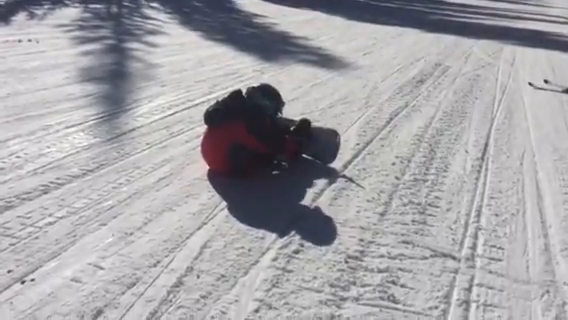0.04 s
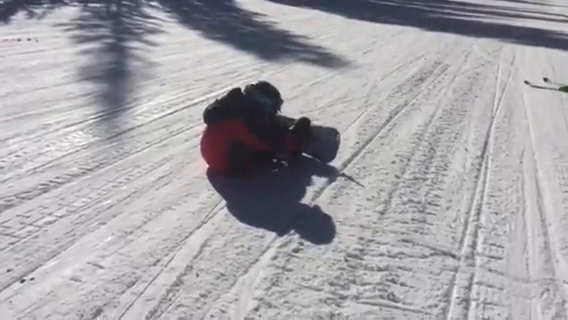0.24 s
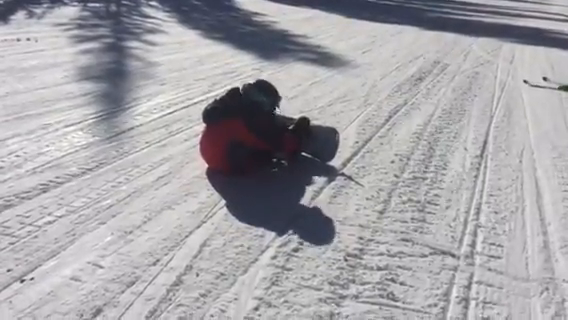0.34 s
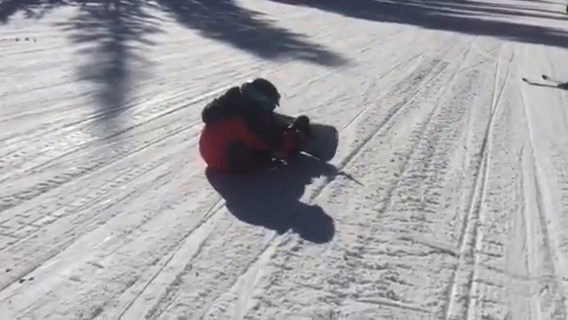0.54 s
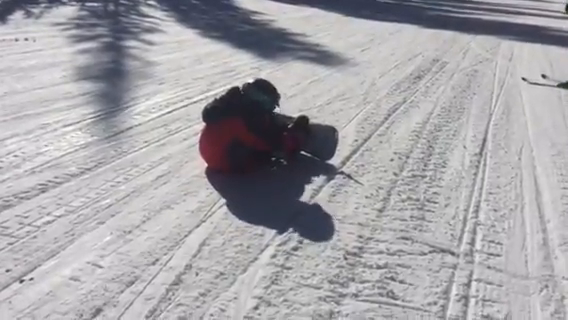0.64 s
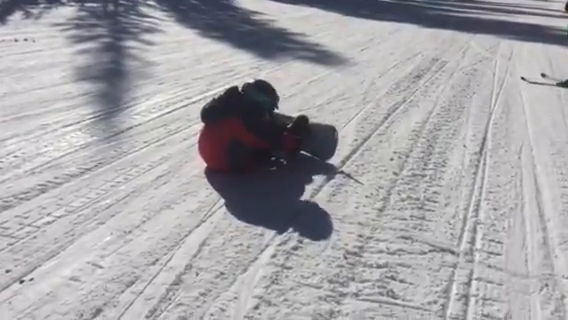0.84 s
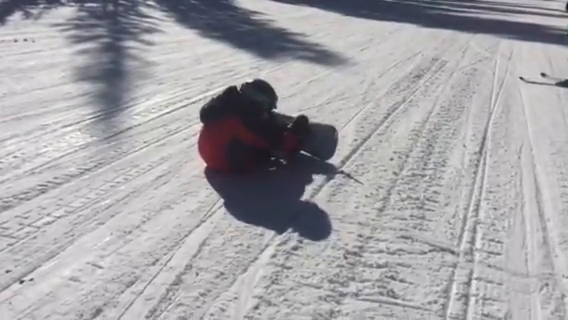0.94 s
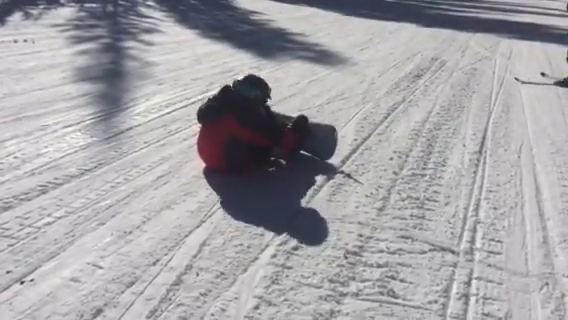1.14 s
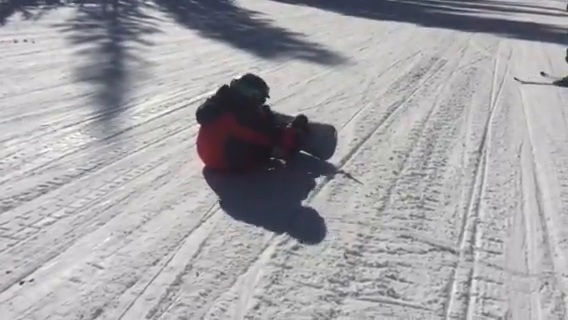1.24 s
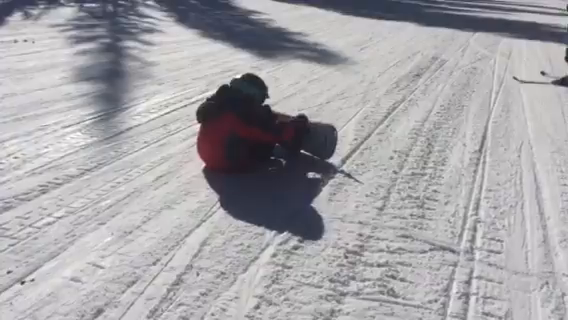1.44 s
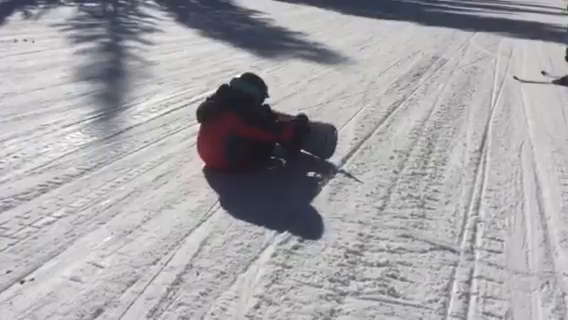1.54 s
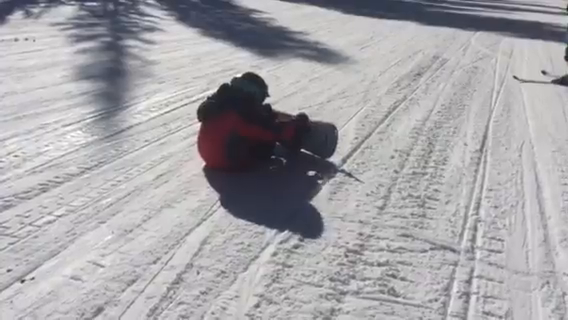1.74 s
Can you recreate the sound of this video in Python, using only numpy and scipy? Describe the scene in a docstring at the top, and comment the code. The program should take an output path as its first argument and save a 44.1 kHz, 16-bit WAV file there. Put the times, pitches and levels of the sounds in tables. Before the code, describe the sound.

Sharp, dry clicks of a snowboard binding sound close by on an open slope. The ratchet snaps twice, a boot knocks softly, a catch clicks and the buckle clacks shut, over faint clothing rustle and low wind.

```python
"""On a groomed slope, over low wind and a far rumble, a snowboarder tightens a binding. Clothes rustle,
then the ratchet snaps twice as its pawl drops over the teeth. The board bumps softly on the snow and the
strap slips in tiny ticks. The boot knocks in its shell, a catch clicks, glove and boot scuff, and last
the buckle clacks down and shakes the board. Each impact rings as a set of heavily damped modes.
Throughout, the snow absorbs nearly all echo, and only a faint scatter returns from the trees."""
import sys
import numpy as np
from scipy import signal
from scipy.fft import rfft, irfft
from scipy.io import wavfile

SR = 44100
rng = np.random.default_rng(int(sys.argv[2]) if len(sys.argv) > 2 else 0)


def wav_record(signal):
    """Record a signal, one row per channel, as 16-bit PCM in the file named by sys.argv[1]."""
    frames = np.transpose(np.atleast_2d(signal))
    bounded = np.clip(frames, -1, 1)
    # unit amplitude maps onto the largest positive 16-bit level
    quanta = np.round(bounded * 32767).astype(np.int16)
    wavfile.write(sys.argv[1], SR, quanta)


N = 79380
TIME = np.arange(N) / SR


def from_db(db):
    """Amplitude ratio of a level in decibels."""
    return 10 ** (np.asarray(db) / 20)


def rms_one(x):
    """Normalisation to unit rms."""
    return x / np.sqrt(np.mean(x ** 2) + 1e-20)


def high_pass(x, hz, order):
    """Butterworth attenuation below a cutoff."""
    return signal.sosfilt(signal.butter(order, hz, "high", fs=SR, output="sos"), x)


def noise(spectrum):
    """Spectral shaping: unit-rms noise with the given relative density, rolled off below its first row."""
    hz, db = np.transpose(spectrum)
    bins_hz = np.maximum(np.fft.rfftfreq(N, 1 / SR), 1)
    roll_off = np.minimum(bins_hz / hz[0], 1) ** 2
    gain = from_db(np.interp(np.log(bins_hz), np.log(hz), db))
    return rms_one(irfft(rfft(rng.standard_normal(N)) * roll_off * gain, N))


def band_noise(hz, edge_ratio, order=1):
    """Band-limited noise of unit rms, its edges a ratio (at least 1.05) below and above the centre."""
    edge_ratio = max(edge_ratio, 1.05)
    edges_hz = [hz / edge_ratio, min(hz * edge_ratio, .45 * SR)]
    band = signal.butter(order, edges_hz, "band", fs=SR, output="sos")
    return rms_one(signal.sosfilt(band, rng.standard_normal(N)))


def drift(rate_hz):
    """Random modulation of unit rms, interpolated between values drawn at the given rate."""
    return rms_one(np.interp(TIME * rate_hz, np.arange(N), rng.standard_normal(N)))


def swell(start_s, rise_s):
    """Critically damped envelope: it reaches 1 after the rise time, then decays."""
    age = np.maximum(TIME - start_s, 0) / rise_s
    return age * np.exp(1 - np.minimum(age, 100))


def strike(start_s, modes, pitch_ratio=1):
    """Modal superposition: an impact excites damped sinusoids that ring for milliseconds."""
    return sum(from_db(db) * swell(start_s, rise_s)
               * np.sin(2 * np.pi * hz * pitch_ratio * (TIME - start_s)) for hz, db, rise_s in modes)


def friction_grain():
    """Amplitude modulation: the rapid random flutter that makes rubbing sound grainy."""
    return from_db(4.5 * drift(rate_hz=1500))


# Spectrum of the far rumble and air: frequency_hz, relative_density_db
AIR_SPECTRUM = [(25, -25.5), (45, -16.5), (80, -1.5), (160, 0), (280, -5.5), (450, -7.5), (650, -8),
                (1000, -16.5), (1700, -20.5), (3200, -23.5), (6000, -27.5), (9300, -29.5), (10500, -33),
                (15600, -33.5), (16200, -55)]
# Spectrum of the distant wash: frequency_hz, relative_density_db
WASH_SPECTRUM = [(120, -22), (250, -1), (450, 2.5), (650, -8), (1000, -13), (2500, -26.5), (16000, -60)]
# Envelope of the wash: time_s, relative_level_db
WASH_ENVELOPE = [(0.0, -74.5), (0.646, -64), (0.952, -72), (1.108, -74.5), (1.8, -79.5)]
def distant_rumble():
    """Ambient noise: a stationary floor, and a low-mid wash that slowly swells and fades."""
    air_db, wash_gain_db = -67, -3.5
    wash_db = wash_gain_db + np.interp(TIME, *np.transpose(WASH_ENVELOPE))
    return from_db(air_db) * noise(AIR_SPECTRUM) + from_db(wash_db) * noise(WASH_SPECTRUM)


# Far-off tones: pitch_hz, level_db
DRONE_TONES = [(88, -69.5), (372, -78.5), (445, -77), (607, -80)]
def drones():
    """Random frequency and amplitude modulation makes each faint tone waver."""
    wander_fraction, waver_db = .025, 3.5
    out = 0
    for hz, db in DRONE_TONES:
        pitch_hz = hz * (1 + wander_fraction * drift(rate_hz=14))
        phase = 2 * np.pi * np.cumsum(pitch_hz) / SR
        waver = from_db(waver_db * drift(rate_hz=9))
        out += from_db(db) * rms_one(waver * np.sin(phase))
    return out


# Spectrum of the wind: frequency_hz, relative_density_db
WIND_SPECTRUM = [(25, -32), (55, -14), (90, -2), (170, -0.5), (260, -14.5), (600, -40), (16000, -80.5)]
# Envelope of the wind: time_s, level_db
WIND_ENVELOPE = [(0.0, -69), (0.42, -63), (0.796, -68), (1.202, -63.5), (1.534, -80), (1.8, -70.5)]
# Buffets of wind at the microphone: start_s, level_db, centre_hz
WIND_BUFFETS = [(.04, -54, 102), (.262, -56.5, 75), (.378, -61, 165), (0.501, -60.5, 114),
                (.598, -58.5, 172.3), (.79, -58.5, 100.5), (1.02, -57, 145), (1.168, -57, 130),
                (1.235, -57.5, 167), (1.71, -56.5, 105.4)]
def wind():
    """Turbulent pressure fluctuations at the microphone give a low rumble with brief buffets."""
    rumble = from_db(np.interp(TIME, *np.transpose(WIND_ENVELOPE))) * noise(WIND_SPECTRUM)
    buffets = sum(from_db(db) * swell(start_s, rise_s=.013) * band_noise(hz, edge_ratio=1.35, order=2)
                  for start_s, db, hz in WIND_BUFFETS)
    return rumble + buffets


# Movements of the clothes: start_s, level_db, rise_s
CLOTH_MOVES = [(.125, -76.5, 0.024), (.2, -76.5, 0.022), (.36, -68, 0.018), (1.044, -69.5, 0.027),
               (1.375, -70.5, 0.018)]
# Spectrum of rubbing cloth: frequency_hz, relative_density_db
CLOTH_SPECTRUM = [(600, -10), (1500, 3.5), (4200, -2), (7000, -5), (16000, -10)]
def clothes():
    """Sliding friction of cloth radiates grainy broadband noise with each movement."""
    envelope = sum(from_db(db) * swell(start_s, rise_s) for start_s, db, rise_s in CLOTH_MOVES)
    return envelope * rms_one(friction_grain() * noise(CLOTH_SPECTRUM))


# Snaps of the pawl: start_s, gain_db, pitch_ratio, landing_delay_s, landing_db, treble_gain_db
PAWL_SNAPS = [(0.2413, -2.5, 1.018, .000725, -8, -4), (0.3894, -0.77, 1.005, 0.0005345, -10, 2)]
# Modes of the ratchet: base_pitch_hz, relative_level_db, rise_s
RATCHET_MODES = [(1272, -33.5, 0.00041), (1917, -49, 0.00025), (2952, -32, 0.00085), (3580, -35, 0.00063),
                 (4116, -22.5, 0.00038), (5195, -14.5, 0.00051), (6104, -12.5, 0.00059),
                 (7850, -12.5, 0.0003), (8460, -21.5, 0.00049), (10900, -29, 0.00029),
                 (12800, -24.5, 0.0004), (13554, -32, 0.00035), (15026, -36.5, 0.0003)]
def ratchet():
    """Two contacts: the pawl slides over a tooth, then lands on it a fraction of a millisecond later; so small
    a radiator gives off no bass."""
    treble_above_hz = 11000
    out = 0
    for start_s, gain_db, pitch_ratio, delay_s, landing_db, treble_db in PAWL_SNAPS:
        modes = [(hz, db + treble_db * (hz > treble_above_hz), rise_s)
                 for hz, db, rise_s in RATCHET_MODES]
        first_contact = strike(start_s, modes, pitch_ratio)
        landing = from_db(landing_db) * strike(start_s + delay_s, modes, pitch_ratio)
        out += from_db(gain_db) * (first_contact + landing)
    return high_pass(out, hz=955, order=6)


# Bumps of the board on the snow: start_s, level_db, pitch_hz, rise_s
BOARD_BUMPS = [(.519, -57, 590, .005), (.6005, -57, 330, .004), (.6015, -60, 1050, .001),
               (.7352, -56, 1050, .0016), (1.243, -54, 175, .005), (1.3065, -59, 1050, .002)]
def board():
    """Damped free vibration: each soft contact with the snow excites a single mode."""
    return sum(strike(start_s, [(hz, db, rise_s)]) for start_s, db, hz, rise_s in BOARD_BUMPS)


# Slips of the strap: start_s, level_db, centre_hz, decay_s, edge_ratio
STRAP_SLIPS = [(0.6023, -49.5, 5140, 0.0015, 1.07), (0.6096, -63, 4000, .001, 1.5),
               (0.72, -57, 2100, .0013, 1.34), (.7357, -57, 2400, .002, 1.35),
               (.751, -58, 2090, 0.0011, 1.3), (.9855, -60.5, 3200, .0012, 1.9),
               (1.0567, -55, 3300, 0.0019, 1.8), (1.1317, -59.5, 2600, 0.0015, 1.7),
               (1.1518, -58, 4000, 0.0011, 1.35), (1.156, -59.5, 6950, .0012, 1.8),
               (1.25, -65, 2100, .0014, 1.4), (1.2869, -61, 4230, .0014, 1.4),
               (1.4252, -51, 4900, .0012, 1)]
def strap():
    """Stick-slip friction: each tiny slip is a noise burst with a sharp onset and exponential decay."""
    out = 0
    for start_s, db, hz, decay_s, edge_ratio in STRAP_SLIPS:
        envelope = (TIME >= start_s) * np.exp(-np.abs(TIME - start_s) / decay_s)
        out += from_db(db) * envelope * band_noise(hz, edge_ratio, order=2)
    return out


# Modes of the boot in its shell: pitch_hz, relative_level_db, rise_s
BOOT_MODES = [(298, -44, 0.0021), (830, -44, .0009), (1137, -39.5, 0.00057), (1710, -44.5, 0.00039),
              (3790, -47, 0.00054), (4290, -40.5, 0.00038), (7400, -65, .0003)]
def boot_knock():
    """Impact excitation: the boot meets its shell, and heavy damping leaves a soft knock."""
    return from_db(-1) * strike(start_s=.9437, modes=BOOT_MODES)


# Modes of the catch: pitch_hz, relative_level_db, rise_s
CATCH_MODES = [(1410, -46, 0.00032), (2850, -32, 0.00038), (4040, -25, 0.00044), (5300, -29, 0.00044),
               (8560, -34.5, 0.00044), (11800, -39.5, 0.00033), (12950, -52.5, .00035), (15400, -50, .0003)]
def catch_click():
    """Impulse response of a small plastic part: high, short-lived modes are heard as a click."""
    return from_db(-1.5) * strike(start_s=1.0656, modes=CATCH_MODES)


# Scuffs of glove and boot: start_s, rub_db, centre_hz, rise_s, thud_db, fizz_db
SCUFF_STROKES = [(1.3055, -57, 1890, .0036, -57.5, -78), (1.3501, -53, 2460, 0.0018, -75, -66.5),
                 (1.3778, -55.5, 2200, 0.0013, -49, -62), (1.4135, -48, 2505, 0.0031, -55, -61)]
def scuffs():
    """Friction noise: a grainy rub with a fizz on top, and a slower, dull thud from the board."""
    grain = rms_one(friction_grain())
    out = 0
    for start_s, rub_db, centre_hz, rise_s, thud_db, fizz_db in SCUFF_STROKES:
        rub = from_db(rub_db) * band_noise(centre_hz, edge_ratio=1.88, order=2)
        fizz = from_db(fizz_db) * band_noise(hz=7500, edge_ratio=1.6)
        thud = from_db(thud_db) * band_noise(hz=340, edge_ratio=1.76, order=2)
        out += swell(start_s, rise_s) * grain * (rub + fizz)
        out += swell(start_s, 1.74 * rise_s) * thud
    return out


# Modes of the buckle and the board under it: pitch_hz, relative_level_db, rise_s
BUCKLE_MODES = [(197, -48, 0.0048), (350, -41, .0022), (620, -34, 0.0012), (975, -34, 0.00069),
                (1280, -33, 0.00049), (1910, -31.5, 0.00044), (2690, -26.5, 0.00051), (4330, -29, 0.00051),
                (5050, -28.5, 0.00086), (6740, -33, 0.00031), (8660, -30.5, 0.00026), (9400, -42, 0.00044),
                (12150, -38, 0.00052), (14000, -42, 0.00033)]
def buckle_clack():
    """Structure-borne vibration: the buckle shuts, and the board adds low modes to its clack."""
    return from_db(-2) * strike(start_s=1.4131, modes=BUCKLE_MODES)


# Spectrum of the scattered sound: frequency_hz, relative_density_db
SCATTER_SPECTRUM = [(300, -1), (2500, 4.5), (4300, 2), (5300, -8), (6400, 1.5), (7800, -5), (9500, -1),
                    (13000, -9)]
def slope_echo(direct):
    """Reflection and scattering: the direct sound, a weak bounce off snow, a diffuse tail from trees."""
    bounce_delay_s, bounce_db = .0065, -37
    trees_delay_s, trees_fade_s, scatter_db = .021, .056, -31.5
    bounce = np.interp(TIME - bounce_delay_s, TIME, direct)
    trees_fade = np.exp(-((TIME - trees_delay_s) / trees_fade_s) ** 2)
    envelope = np.where(TIME < trees_delay_s, from_db(-5), trees_fade)  # weaker until the trees answer
    response = envelope * noise(SCATTER_SPECTRUM)
    scatter = signal.fftconvolve(direct, response / np.sqrt(np.sum(response ** 2)))[:N]
    return direct + from_db(bounce_db) * bounce + from_db(scatter_db) * scatter


def scene():
    """Superposition: the background and the snowboarder's sounds with their echo add in one channel."""
    background = distant_rumble() + drones() + wind()
    rider = (clothes() + ratchet() + board() + strap()
             + boot_knock() + catch_click() + scuffs() + buckle_clack())
    return (background + slope_echo(rider))[None]


def record(dry):
    """Band limiting: the microphone drops the deep bass and cuts the top steeply."""
    low_hz, high_hz = 59.7, 16200
    low_pass = signal.butter(20, high_hz, fs=SR, output="sos")
    return signal.sosfilt(low_pass, high_pass(dry, low_hz, order=2))


dry = scene()
out = record(dry)
wav_record(out)
```